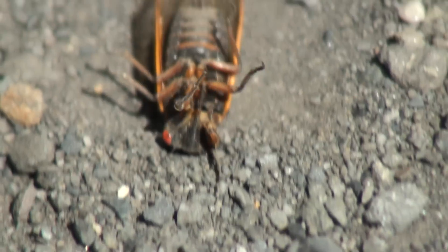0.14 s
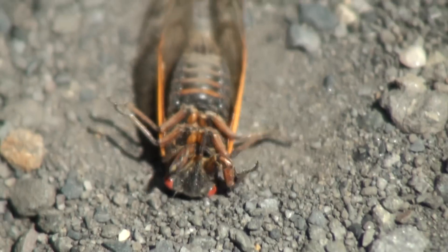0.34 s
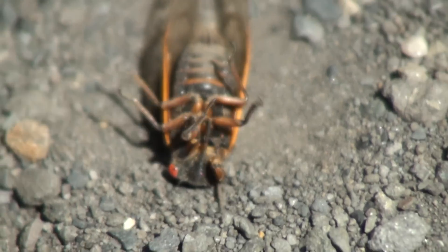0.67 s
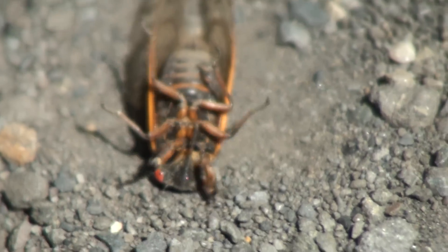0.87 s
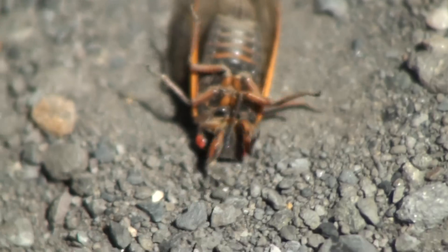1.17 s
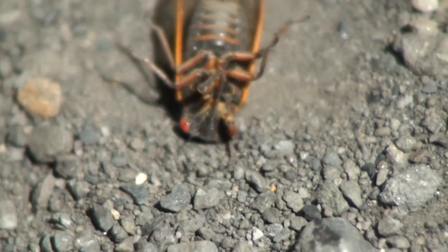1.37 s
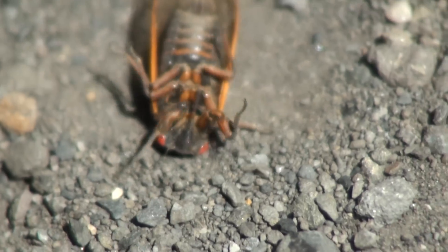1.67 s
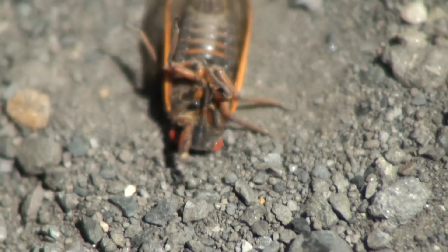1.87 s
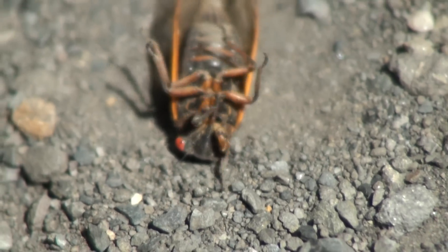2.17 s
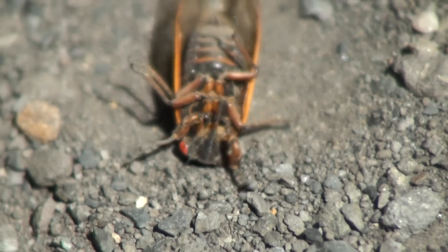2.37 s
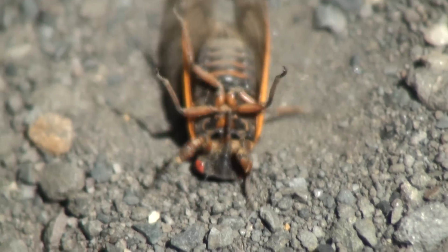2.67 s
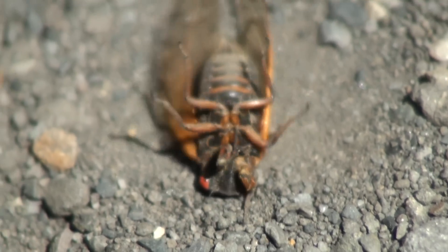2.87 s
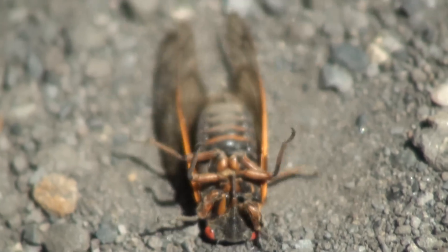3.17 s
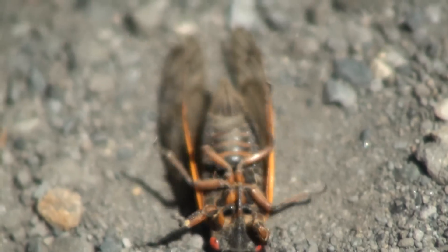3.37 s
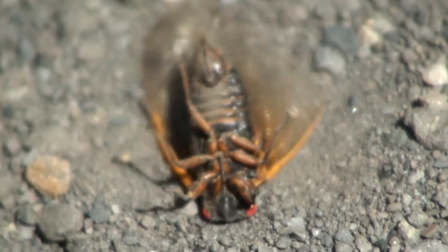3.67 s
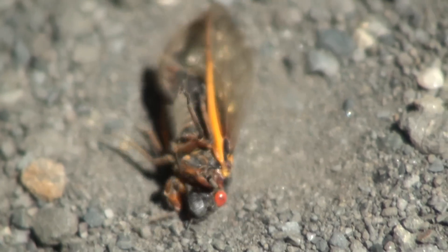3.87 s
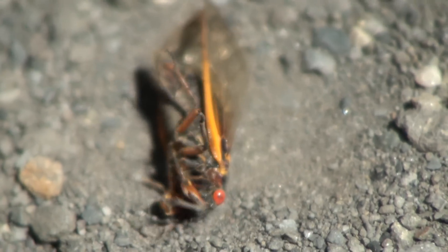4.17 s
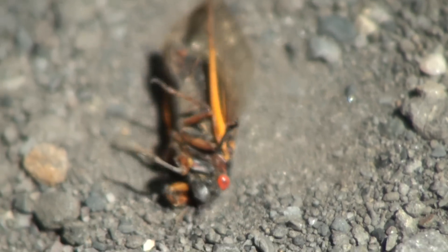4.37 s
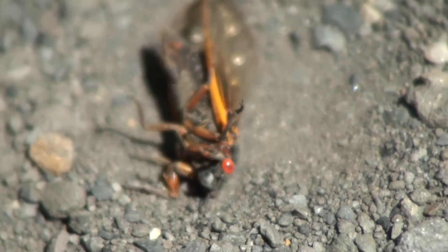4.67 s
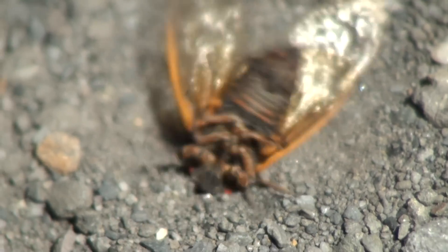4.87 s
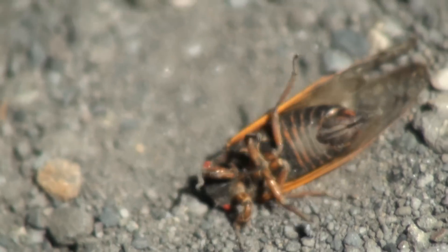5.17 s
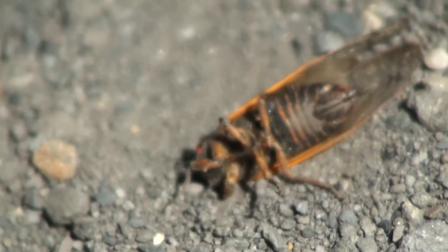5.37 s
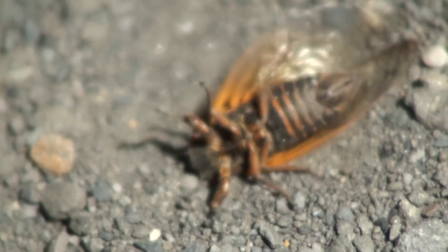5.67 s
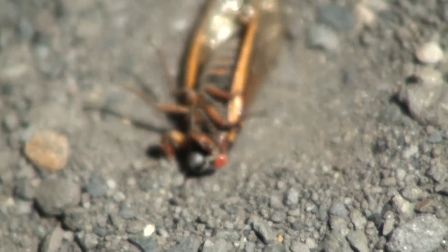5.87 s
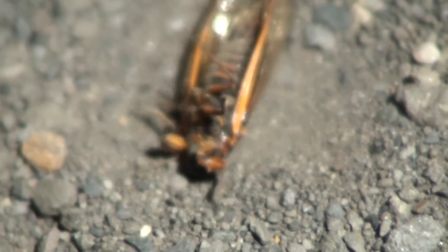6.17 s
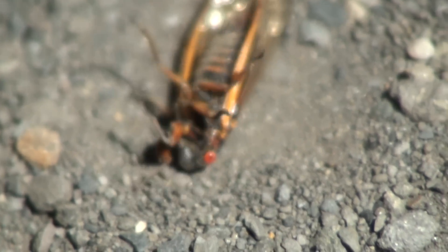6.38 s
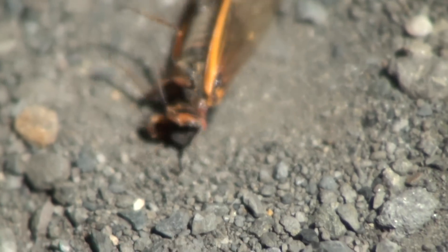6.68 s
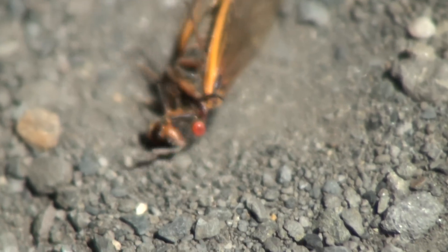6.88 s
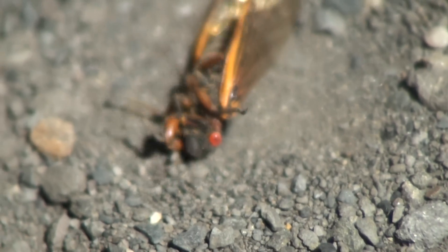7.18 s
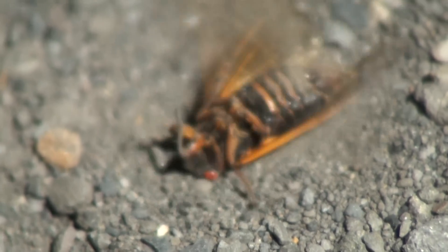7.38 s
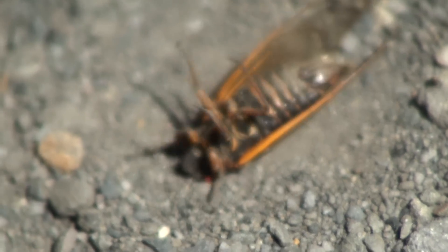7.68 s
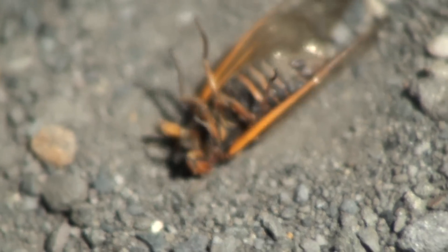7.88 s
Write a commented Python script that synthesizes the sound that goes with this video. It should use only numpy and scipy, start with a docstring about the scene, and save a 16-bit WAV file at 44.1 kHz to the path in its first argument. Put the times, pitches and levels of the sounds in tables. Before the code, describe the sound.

A wide stereo wall of cicada song never pauses, its tone centred a little above one kilohertz and leaning slightly left. Early handling bumps thump softly at the microphone. Then a nearby cicada struggling on gritty ground gives quick crisp wing flutters, strongest around two and a half to four seconds, with sparse ones later. A faint distant hum and rumble stay almost buried, and more bumps come just before the end.

```python
"""From the start a vast cicada chorus drones in trees all around: clicks rung by hollow bodies, under a haze of noise.
Low noise rumbles in the distance, a far narrow band swells now and then, and a small motor hums in faint sines.
From about 0.6 s a hand now and then knocks the microphone housing: noise puffs ring its resonances.
From about 1.5 s one cicada close by beats its wings on gravel: puffs ring a stiff membrane, amid rustling grains."""
import sys
import numpy as np
from scipy import signal
from scipy.fft import rfft, irfft, next_fast_len
from scipy.io import wavfile

SR = 44100
rng = np.random.default_rng(int(sys.argv[2]) if len(sys.argv) > 2 else 0)


def inscribe(sig):
    """Save sig as 16-bit PCM at rate SR to the path in sys.argv[1].

    A 1-D sig is mono; a 2-D sig holds one channel per row.
    Samples are clipped to [-1, 1] before scaling.
    """
    pcm = np.round(np.clip(np.atleast_2d(sig).T, -1, 1) * 32767)
    wavfile.write(sys.argv[1], SR, pcm.astype(np.int16))


N = 354563

# Hollow bodies of the singers: f/Hz, width of one pass/Hz, relative level/dB
SINGER_BODIES = [(855, 77, -22.5), (917.6, 97, -21), (1040, 198, -22), (1204.3, 139, -10.5),
                 (1303.6, 76, -2), (1365, 109.5, -1.5), (1405, 132, -6.5), (1525, 268, -18.5)]
# Overtones and far buzzers of the crowd: f/Hz, relative level per Hz/dB
HAZE_SPECTRUM = [(880, -35), (1500, -3), (1670, -20), (1780, -20), (2040, -18.5), (2210, -19.5),
                 (2780, -18.5), (3200, -30), (3570, -28), (3980, -22), (6360, -30.5), (9020, -27),
                 (10900, -33), (11900, -31.5), (16200, -48.5)]
# Spread of the haze to the sides: f/Hz, side-to-mid level/dB
HAZE_SPREAD = [(1500, -14), (3000, -7.5), (6500, -11), (10000, -6), (11300, -4.5), (12000, -29)]
# Distant low noise: f/Hz, relative level per Hz/dB
RUMBLE_SPECTRUM = [(20, -13), (55, -19), (63, -6), (110, -8), (142, -9), (175, -5), (320, -7), (365, -12),
                   (400, -10.5), (500, -10.5), (620, -18), (760, -10.5), (1100, -31)]
# Spread of the rumble to the sides: f/Hz, side-to-mid level/dB
RUMBLE_SPREAD = [(40, -18), (150, -21), (250, -8.5), (310, -6), (370, 3.5), (420, -1), (510, 0), (570, 1),
                 (700, 3), (900, -34)]
# Swells of the far drone: centre t/s, half length/s, level rise/dB
FAR_DRONE_SWELLS = [(2.3, .25, 11.5), (4.2, 0.87, 8), (7.0, 1, 10)]
# Motor overtones: multiple of the fundamental, mid level/dB, side level/dB
MOTOR_OVERTONES = [(1, -59, -72.5), (2, -81, -83), (3, -74.5, -75), (4, -69.5, -82), (5, -68.5, -70),
                   (7, -78, -79), (9, -77.5, -84), (10, -80, -70), (11, -85, -73)]
# Knocks on the microphone housing: t/s, peak level of the shell modes/dB
HOUSING_KNOCKS = [(0.575, -34), (0.65, -42), (0.685, -37), (0.793, -43), (1.096, -38), (1.119, -38),
                  (1.202, -31.5), (1.224, -42), (1.249, -37), (1.377, -35), (1.395, -36), (1.409, -35),
                  (1.429, -40), (1.471, -38), (7.632, -36), (7.86, -45), (7.879, -44), (7.902, -36),
                  (7.957, -28), (7.972, -30.5)]
# Shell of the housing: f/Hz, width/Hz, relative level/dB
SHELL_MODES = [(420, 127, -6.5), (620, 164, 2.5), (785, 410, -0.5)]
# Rocking between the capsules: f/Hz, width/Hz, relative level/dB
ROCKING_MODES = [(230, 120, -5), (360, 160, 3), (480, 120, 6)]
# Wings slapping the gravel close by: t/s, membrane peak level/dB, low part relative to it/dB
WING_SLAPS = [(1.5279, -45, -13), (1.5609, -44, -12), (2.5, -33, -15), (2.5172, -28, -5),
              (2.5544, -42, -11), (2.9487, -35, -13), (2.9731, -42, -10), (2.9878, -33.5, 2),
              (3.0096, -37, -7), (3.025, -32, -13), (3.0414, -42, -10), (3.0609, -31.5, -5),
              (3.596, -31.5, -15), (3.622, -35, -18), (3.6441, -32, -10), (3.675, -34.5, 1),
              (3.6904, -40, -15), (3.7054, -38, -10), (3.7214, -39, -11), (3.74, -33, -6),
              (4.8985, -34, -14), (4.9214, -36, -10), (5.7778, -36, -15), (5.7952, -33, -6),
              (7.3881, -34, -8), (7.405, -32, -6), (7.4405, -40, -10)]
# Stiff wing membrane: f/Hz, width/Hz, relative level/dB
MEMBRANE_MODES = [(11770, 500, 6), (13000, 1000, 1.5), (14700, 3200, -8), (9200, 2500, 0)]

# Pan is left over right; drift corners set how fast a random wander moves.
CLICKS_PER_S = 9000   # for each hollow body separately, in each of mid and side
SONG_DB, SONG_SIDE_DB = -25.5, -7   # mid level; side gain for singers off to the sides
SONG_SWELL_DB, SONG_DRIFT_HZ = 0.11, 0.35   # spread of the level drift; its corner
SONG_PAN_DB, SONG_SWAY_DB = 1.7, 0.2   # mean lean to the left; spread of its sway
HAZE_DB, HAZE_PAN_DB = -42.5, 1.2
RUMBLE_DB, RUMBLE_PAN_DB = -53, -3
DRONE_DB, DRONE_HZ, DRONE_WIDTH_HZ = -73, 126.9, 3.8   # level between swells; width of one pass
HUM_HZ, HUM_PAN_DB, HUM_WAVER_DB = 66.36, 0, 1   # waver of the fundamental
KNOCK_RISE_S, KNOCK_T60_S = 0.001, 0.044
TAP_DB, TAP_HZ, TAP_WIDTH_HZ = -26, 3000, 4000   # hard edge of a knock, relative to the shell modes
THUD_HZ, THUD_WIDTH_HZ = 150, 330
THUD_DB, THUD_FOLLOWS, USUAL_KNOCK_DB = -44.5, 0.7, -38.5   # thud of a usual knock; share of extra dB followed
ROCK_DB = 0   # rocking relative to the shell modes
RUSTLE_DB, RUSTLE_S = -20, 0.011   # relative to the slap's peak; decay time either side of it
WING_RISE_S, WING_T60_S, WING_GRIT_DB = 0.00054, 0.017, 3.5   # grit is the scratch's unevenness
WING_LOW_HZ, WING_LOW_WIDTH_HZ = 6560, 880   # duller sound of the stones
WING_SIDE_DB = -18   # side share of that duller part
CUTOFF_HZ = 16450


def from_db(db):
    """Decibels to gain."""
    return 10 ** (np.asarray(db) / 20)


def rms_one(x):
    """Scale to rms 1."""
    return x / np.sqrt(np.mean(x ** 2) + 1e-20)


def peak_one(x):
    """Scale to peak 1."""
    return x / np.abs(x).max()


def drift(corner_hz):
    """Random wander of rms 1: coarse noise through two equal one-pole low-passes."""
    step = 40   # samples between coarse points
    run_in = 2000   # coarse points dropped while the filter settles
    pole = np.exp(-2 * np.pi * corner_hz * step / SR)
    noise = rng.standard_normal(N // step + 2 + run_in)
    slow = signal.lfilter([1], [1, -2 * pole, pole ** 2], noise)[run_in:]
    return np.interp(np.arange(N) / step, np.arange(len(slow)), rms_one(slow))


def resonate(x, hz, width_hz):
    """One two-pole resonance with gain about 1 at its top."""
    radius = np.exp(-np.pi * width_hz / SR)
    zeros = np.array([1, 0, -1]) * (1 - radius ** 2) / 2
    poles = [1, -2 * radius * np.cos(2 * np.pi * hz / SR), radius ** 2]
    return signal.lfilter(zeros, poles, x)


def modes(x, table):
    """Parallel resonances with alternating signs."""
    out = 0
    for k, (hz, width_hz, mode_db) in enumerate(table):
        out = out + (-1) ** k * from_db(mode_db) * resonate(x, hz, width_hz)
    return out


def stereo(mid, side, pan_db):
    """Left and right from mid and side, with the left raised over the right by pan_db."""
    left_right = np.array([[1], [-1]])
    return (mid + side * left_right) * from_db(pan_db / 2 * left_right)


def coloured(spectrum, spread):
    """Steady mid noise of rms 1 with the given spectrum, and its unrelated side noise."""
    size = next_fast_len(N)
    log_hz = np.log(np.arange(size // 2 + 1) * SR / size + 1)
    spectrum, spread = np.array(spectrum), np.array(spread)
    mid_db = np.interp(log_hz, np.log(spectrum[:, 0]), spectrum[:, 1])
    side_db = mid_db + np.interp(log_hz, np.log(spread[:, 0]), spread[:, 1])
    white = rfft(rng.standard_normal((2, size)))
    noise = irfft(white * from_db([mid_db, side_db]), size)[:, :N]
    return noise / np.std(noise[0])


def burst(s, rise_s, t60_s, grit_db):
    """Start sample and a short uneven puff of noise that swells and dies away."""
    t = np.arange(round(0.1 * SR)) / SR
    held = np.repeat(rng.standard_normal(len(t) // 30 + 1), 30)[:len(t)]   # new level every 30 samples
    envelope = (1 - np.exp(-t / rise_s)) * from_db(-60 * t / t60_s)
    return round(s * SR), from_db(grit_db * held) * rng.standard_normal(len(t)) * envelope


def add(out, at, piece):
    """Mix a stereo piece in at a sample."""
    out[:, at:at + piece.shape[1]] += piece[:, :N - at]


def chorus():
    """Countless membrane clicks ring in hollow bodies of several sizes; the overlap turns them into a drone."""
    song = 0
    for hz, width_hz, body_db in SINGER_BODIES:
        clicks = rng.standard_normal((2, N)) * (rng.random((2, N)) < CLICKS_PER_S / SR)
        # membrane and air sac are tuned alike: the resonance acts twice
        rung = resonate(resonate(clicks, hz, width_hz), hz, width_hz)
        song = song + from_db(body_db) * rung
    level_db = SONG_DB + SONG_SWELL_DB * drift(SONG_DRIFT_HZ)
    mid, side = song / np.std(song[0]) * from_db(level_db)
    pan_db = SONG_PAN_DB + SONG_SWAY_DB * drift(SONG_DRIFT_HZ)
    return stereo(mid, from_db(SONG_SIDE_DB) * side, pan_db)


def haze():
    """The crowd's overtones and far buzzers as broad shaped noise, flickering a little."""
    level_db = HAZE_DB + 0.25 * drift(15)
    mid, side = coloured(HAZE_SPECTRUM, HAZE_SPREAD) * from_db(level_db)
    return stereo(mid, side, HAZE_PAN_DB)


def rumble():
    """Distant low shaped noise, its level wavering slightly."""
    level_db = RUMBLE_DB + 0.17 * drift(3.1)
    mid, side = coloured(RUMBLE_SPECTRUM, RUMBLE_SPREAD) * from_db(level_db)
    return stereo(mid, side, RUMBLE_PAN_DB)


def drone():
    """A narrow band of low noise from far away, resonated twice and swelling now and then."""
    t = np.arange(N) / SR
    level_db = DRONE_DB
    for s, half_s, rise_db in FAR_DRONE_SWELLS:
        level_db = level_db + rise_db * np.exp(-((t - s) / half_s) ** 2)
    band = resonate(rng.standard_normal(N), DRONE_HZ, DRONE_WIDTH_HZ)
    band = resonate(band, DRONE_HZ, DRONE_WIDTH_HZ)
    return from_db(level_db) * rms_one(band)


def hum():
    """A small motor of nearly steady pitch; its overtones waver and reach the two capsules unequally."""
    turns = np.cumsum(HUM_HZ + 0.09 * drift(1.87)) / SR
    out = 0
    for multiple, mid_db, side_db in MOTOR_OVERTONES:
        tone = np.sqrt(2) * np.sin(2 * np.pi * (multiple * turns + rng.random()))
        # higher overtones waver more
        tone = tone * from_db(np.sqrt(multiple) * HUM_WAVER_DB * drift(0.7))
        out = out + stereo(from_db(mid_db) * tone, from_db(side_db) * tone, HUM_PAN_DB)
    return out


def knocks():
    """Dull taps ring the housing: a shell part, a low thud and a rocking that shakes the capsules oppositely."""
    out = np.zeros((2, N))
    for s, peak_db in HOUSING_KNOCKS:
        at, puff = burst(s, KNOCK_RISE_S, KNOCK_T60_S, 0)
        edge = puff * np.exp(-np.arange(len(puff)) / (0.0029 * SR))   # dies sooner than the puff
        tap = from_db(TAP_DB) * peak_one(resonate(edge, TAP_HZ, TAP_WIDTH_HZ))
        shell = peak_one(modes(puff, SHELL_MODES)) + tap
        thud_db = THUD_DB + THUD_FOLLOWS * (peak_db - USUAL_KNOCK_DB)
        thud = from_db(thud_db) * peak_one(resonate(puff, THUD_HZ, THUD_WIDTH_HZ))
        _, rock = burst(s, KNOCK_RISE_S, KNOCK_T60_S, 0)
        side = from_db(peak_db + ROCK_DB) * peak_one(modes(rock, ROCKING_MODES))
        add(out, at, stereo(from_db(peak_db) * shell + thud, side, -1.0))
    return out


def rustle():
    """Wings rub fine grit around each slap: random grains ring the membrane, swelling towards it and fading."""
    t = np.arange(N) / SR
    swell = np.zeros(N)
    for s, peak_db, _ in WING_SLAPS:
        near = slice(round((s - 0.06) * SR), round((s + 0.06) * SR))
        swell[near] += from_db(peak_db + RUSTLE_DB) * np.exp(-np.abs(t[near] - s) / RUSTLE_S)
    grains = rng.standard_normal(N) * (rng.random(N) < 1200 / SR)   # 1200 grains a second
    return swell * rms_one(modes(grains, MEMBRANE_MODES))


def wings():
    """Each slap close by is a gritty scratch that rings the membrane, with a duller part from the stones."""
    out = np.zeros((2, N))
    for s, peak_db, low_db in WING_SLAPS:
        at, puff = burst(s, WING_RISE_S, WING_T60_S, WING_GRIT_DB)
        slap = peak_one(modes(puff, MEMBRANE_MODES))
        low = from_db(low_db) * peak_one(resonate(puff, WING_LOW_HZ, WING_LOW_WIDTH_HZ))
        mid = from_db(peak_db) * (slap + low)
        side = from_db(peak_db + WING_SIDE_DB) * low
        add(out, at, stereo(mid, side, 0.3))
    return out


def scene():
    """Everything that reaches the microphone."""
    return chorus() + haze() + rumble() + drone() + hum() + knocks() + rustle() + wings()


def record(dry):
    """A steep elliptic low-pass cuts the top."""
    low_pass = signal.ellip(12, 0.3, 80, CUTOFF_HZ, fs=SR, output="sos")   # order, ripple/dB, stop depth/dB
    return signal.sosfilt(low_pass, dry)


dry = scene()
out = record(dry)
inscribe(out)
```